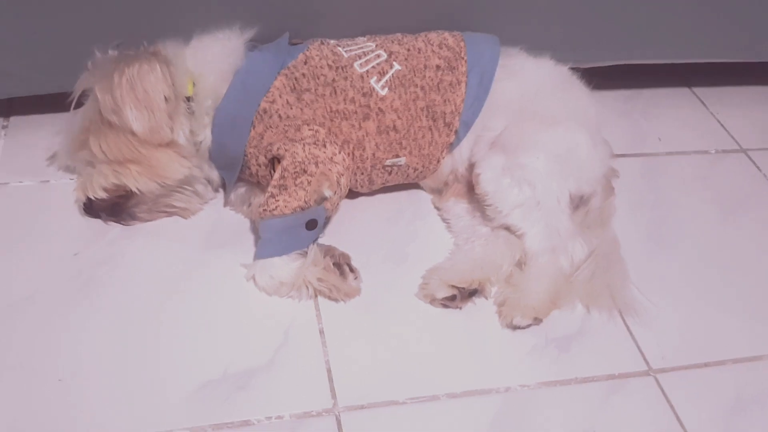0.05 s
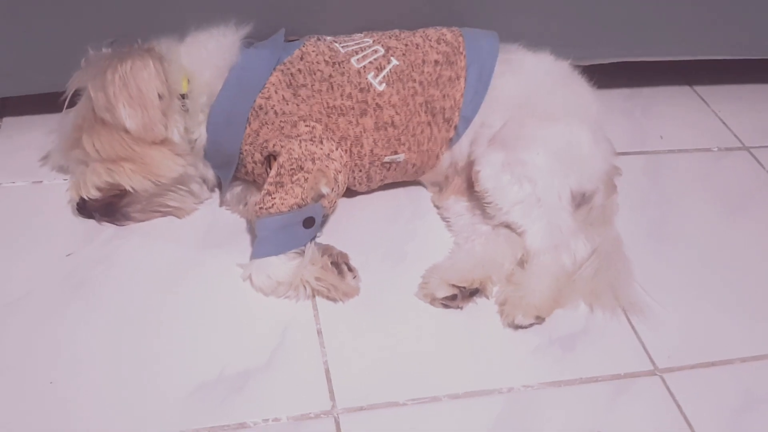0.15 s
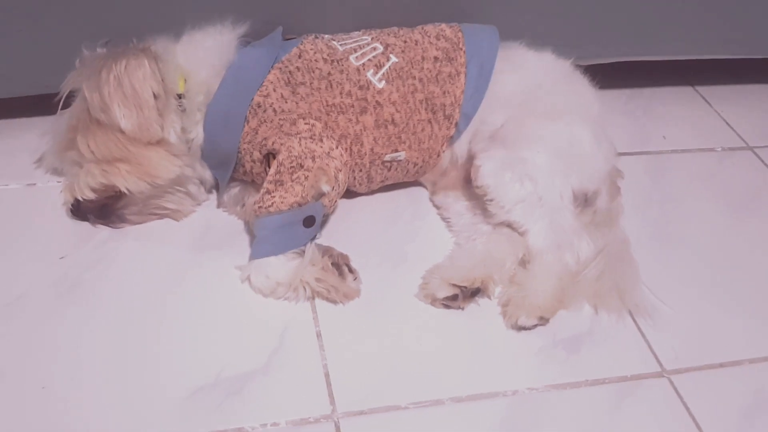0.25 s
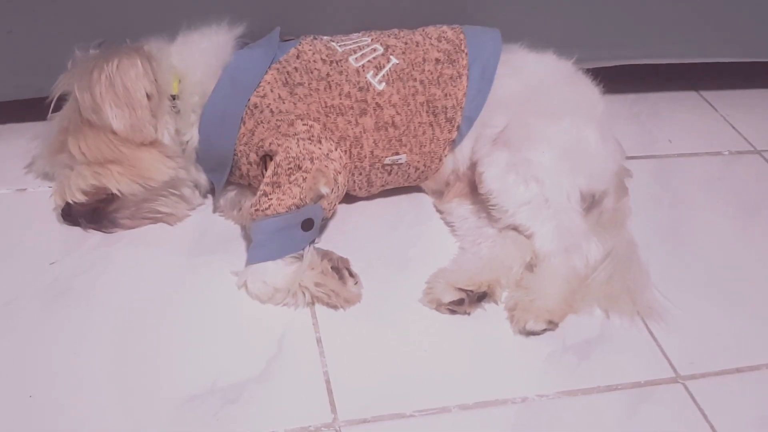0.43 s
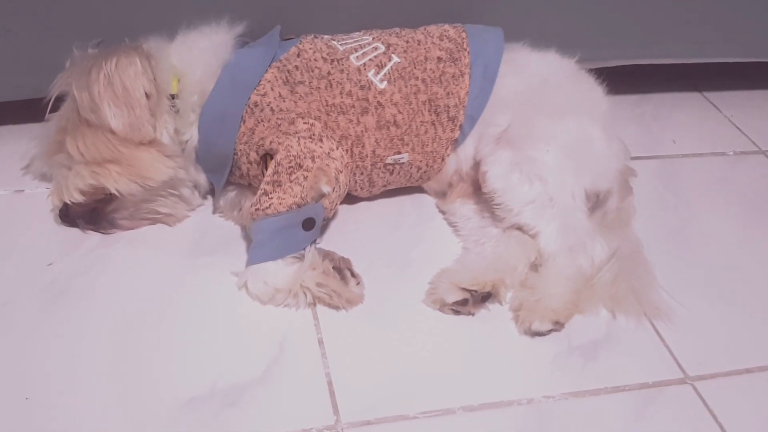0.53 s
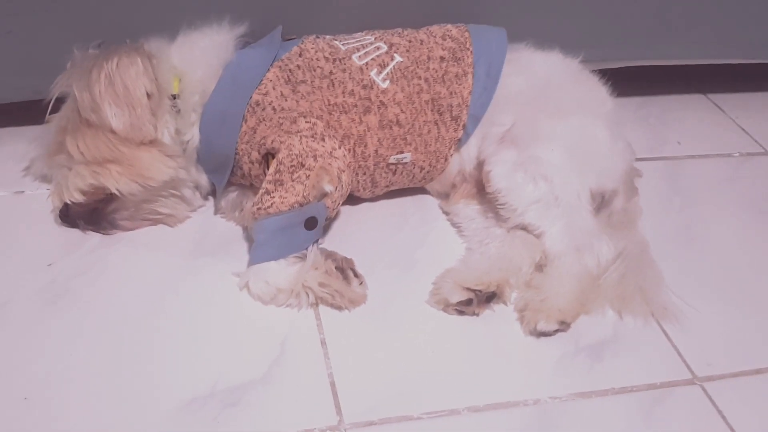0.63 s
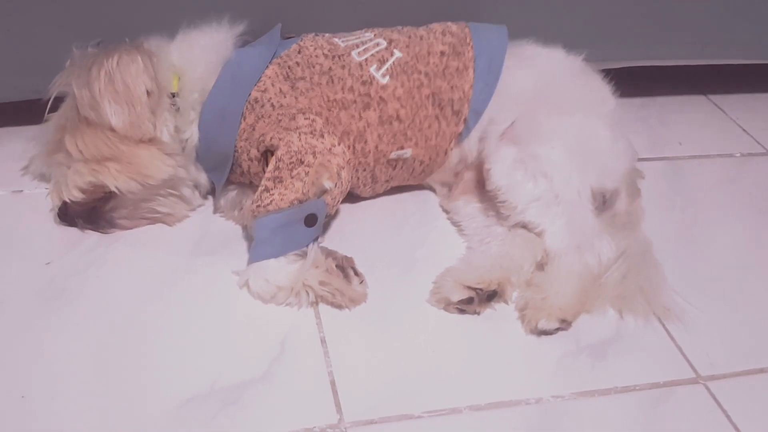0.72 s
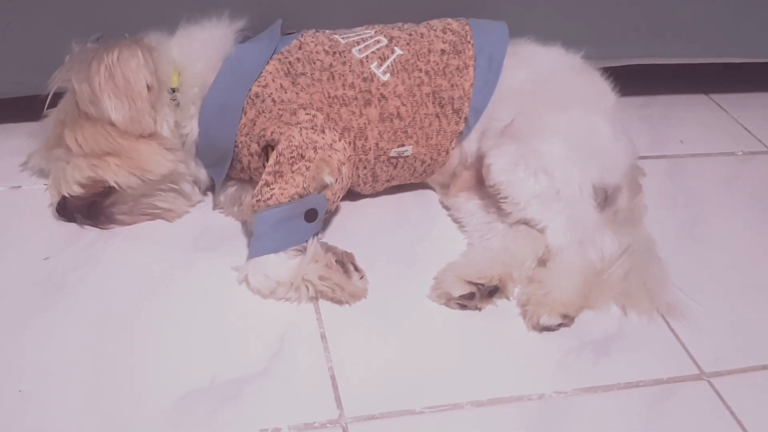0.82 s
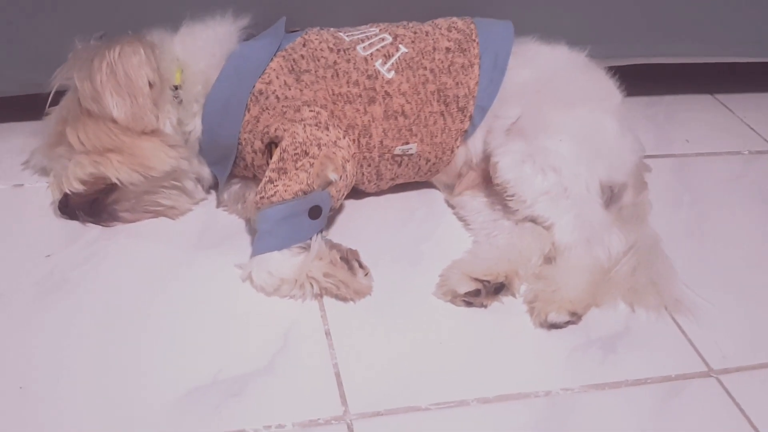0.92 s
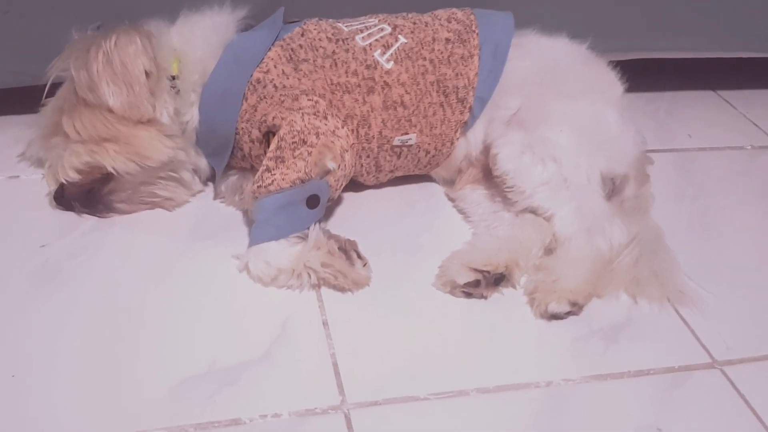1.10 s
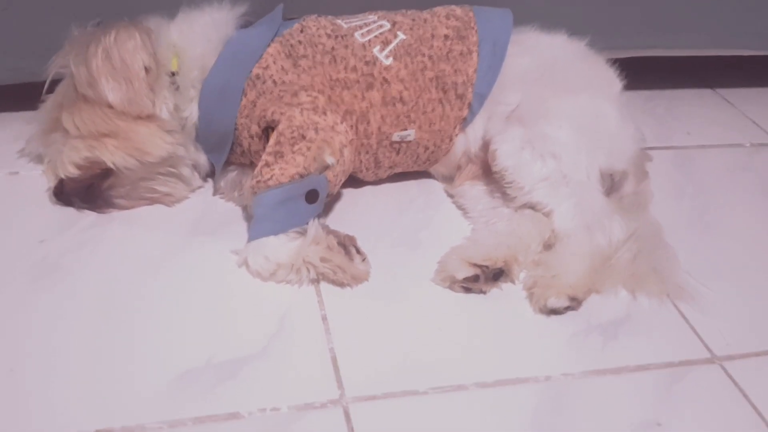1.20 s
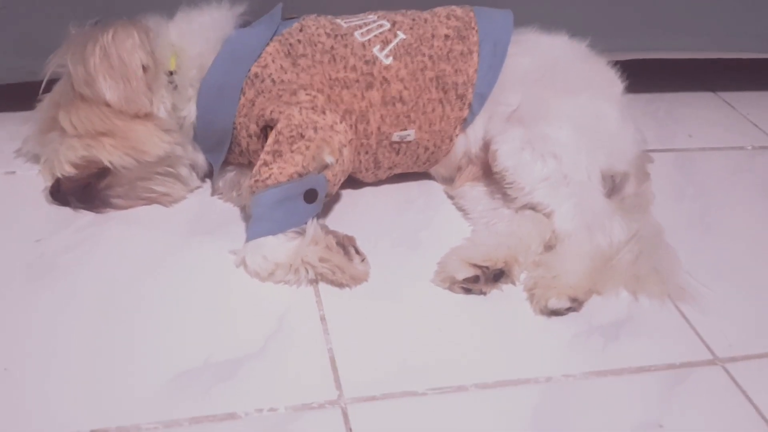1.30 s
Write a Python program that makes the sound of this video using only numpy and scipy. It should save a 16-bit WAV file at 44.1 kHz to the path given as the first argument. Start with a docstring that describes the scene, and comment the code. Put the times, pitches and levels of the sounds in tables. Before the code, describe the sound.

A sleeping dog gives one muffled woof, with small squeaks and puffs, close by indoors.

```python
"""Over a faint low hum, a small dog sniffs and grunts softly as it dreams on a tiled floor close by.
A squeak leads into one muffled woof: the voice hums behind shut lips, then puffs out the cheeks.
A second squeak ends in only a puff. Air hisses through the nose and lips, the wet lips smack,
and the hard room rings after each sound."""
import sys
import numpy as np
from scipy import signal
from scipy.fft import rfft, irfft
from scipy.io import wavfile

SR = 44100
rng = np.random.default_rng(int(sys.argv[2]) if len(sys.argv) > 2 else 0)


def master_out(mix):
    """Clip the mix to full scale and print it as 16-bit PCM to the path in sys.argv[1]."""
    frames = np.transpose(np.atleast_2d(mix))
    ceiling = np.clip(frames, -1, 1)
    pcm = np.round(ceiling * 32767).astype(np.int16)
    wavfile.write(sys.argv[1], SR, pcm)


N = 59535
T = np.arange(N) / SR
HZ = np.fft.rfftfreq(2 * N, 1 / SR)

# The tone of the room's steady noise: f/Hz, level/dB
ROOM_NOISE_TONE = [(20, -8), (40, -13.5), (65, 3.5), (92, -8), (125, 5.5), (170, -12.5), (290, -11),
                   (520, -28.5), (1500, -29.5), (3000, -28), (7000, -28), (9000, -40), (15500, -32)]
# The two notes of the low hum: f/Hz, level/dB
HUM_NOTES = [(70, -70), (118.6, -61)]
# Breaths through the nose: start t/s, length t/s, level/dB
SNIFFS = [(-.015, 0.093, -49), (.055, .11, -55.5)]
# The tone of air in the nose: f/Hz, level/dB
SNIFF_TONE = [(100, -17), (300, 11), (720, -4), (1000, -8), (2500, -11), (3050, -5), (3800, -14.5),
              (4850, -1.5), (5800, -15), (8300, -35.5), (10500, -26), (15000, -47)]
# How the grunt moves: t/s, pitch f/Hz, level/dB
GRUNT_PATH = [(.004, 211.5, -51.5), (.025, 241.6, -43), (.037, 237.6, -31), (.056, 239.7, -38),
              (.078, 218.5, -43.5), (.11, 213, -55)]
# How the grunt's overtones are turned down: f/Hz, level/dB
GRUNT_TONE = [(230, -2), (470, -16), (700, -17), (1000, -42.5), (2000, -69)]
# How the two squeaks move, one list each: t/s, pitch f/Hz, level/dB
SQUEAK_PATHS = [
    [(.174, 430, -33), (.188, 577, -33.5), (.197, 615, -24.5), (.212, 626, -37.5), (.224, 570, -27.5)],
    [(.727, 620, -38), (.735, 649, -40.5), (.748, 673, -40), (.761, 623, -38.5), (.768, 630, -47)],
]
# How the squeaks' overtones are turned down: f/Hz, level/dB
SQUEAK_TONE = [(450, -3), (630, -3.5), (1220, -15.5), (1400, -22.5), (1750, -31), (2020, -14), (2600, -26),
               (4300, -32), (6000, -41), (7800, -45), (10000, -58)]
# A rising whistle in each squeak: start t/s, length t/s, from f/Hz, to f/Hz, level/dB
WHISTLES = [(0.208, 0.011, 900, 950, -36), (0.742, 0.0248, 712.6, 1195, -42.5)]
# Breaths through the lips: start t/s, length t/s, level/dB
PUFFS = [(.217, 0.068, -37), (.268, 0.069, -42), (.771, 0.052, -42), (1.29, .1, -70)]
# The tone of air between the lips: f/Hz, level/dB
PUFF_TONE = [(300, -3), (620, -2), (1300, -4.5), (1900, 3), (2500, 3), (3100, -0.5), (3900, -8.5),
             (6200, -25), (7600, -20), (10000, -37), (15000, -29.5)]
# How the woof moves: t/s, pitch f/Hz, shut-lip level/dB, open-cheek level/dB, rasp level/dB
WOOF_PATH = [(.231, 150.5, -39, -69.5, -34), (.254, 149.9, -21.5, -53, -47.5), (.292, 158.6, -25, -54, -34),
             (.314, 153.3, -25, -52.5, -31.5), (.334, 140.8, -25, -31, -33.5),
             (.358, 139, -16, -24.5, -33.5), (.372, 140.3, -23.5, -33, -32), (.383, 142.3, -34, -29.5, -30),
             (.404, 139.1, -23, -24.5, -29), (.442, 136.5, -29, -37, -31.5),
             (.462, 131.6, -53.5, -45.5, -35), (.59, 133, -79.5, -100, -58.5)]
# How throat and cheeks colour the woof: f/Hz, shut-lip level/dB, open-cheek level/dB
THROAT_TONE = [(147, -10, -20), (309, 3, -17.5), (438, -22, -7.5), (560, -36.5, 1.5), (705, -37, -10.5),
               (806, -12, -4), (860, -32.5, -11), (1166, -43, -27.5), (1500, -35, -41)]
# The tone of the woof's rasp: f/Hz, level/dB
RASP_TONE = [(60, -56.5), (105, -24), (145, 0), (225, 8), (480, 2), (780, 5), (1150, -7.5), (1600, -11),
             (2200, -17.5), (4000, -30.5), (7000, -42), (15000, -67.5)]
# Lip smacks: t/s, level/dB, ring f/Hz, fade t/s
SMACKS = [(0.2708, -29, 5330, 0.00014), (.293, -21.5, 4800, 0.00011), (0.3074, -16, 4000, 0.00015),
          (.442, -39, 4760, 0.00012), (.548, -43.5, 4400, 0.000089), (0.8224, -17.5, 3014, 0.00014),
          (1.214, -41, 4800, 0.000067)]
# The room's ring: f/Hz, t/s to fade by 60 dB, level/dB, left-right likeness (0 to 1)
ROOM_RING = [(130, 0.66, -2.5, 0.84), (310, 0.19, -9, 0.89), (594, 0.39, -3.5, .4), (1203, 0.27, -4.5, 0),
             (3960, 0.25, -1, 0), (7650, 0.25, 7, 0.021), (14900, 0.14, 4.5, 0.049)]

TREMBLE_HZ, SQUEAK_JITTER = 90, .012  # jitter is random pitch wobble, as a share of the pitch


def amp(db):
    """Turns decibels into a number to multiply by."""
    return 10 ** (np.asarray(db) / 20)


def unit(x):
    """Scales a signal to an average strength (rms) of 1."""
    return x / np.sqrt(np.mean(x ** 2) + 1e-20)


def look_up(table, hz, column=1):
    """Reads a table between its rows, on a log scale of frequency."""
    columns = np.transpose(table)
    return np.interp(np.log(hz + 1), np.log(columns[0] + 1), columns[column])


def follow(path, fade_s=.004):
    """Gives a gate that fades a sound in and out, then the path's columns as curves in time."""
    times, *columns = np.transpose(path)
    gate = np.clip(np.minimum(T - times[0], times[-1] - T) / fade_s, 0, 1)
    return [gate] + [np.interp(T, times, column) for column in columns]


def shape(x, gain):
    """Filters a signal with one gain for each frequency."""
    return irfft(rfft(x, 2 * N) * gain)[..., :N]


def wander(hz):
    """A random wobble of strength 1, up to about the given speed."""
    return unit(shape(rng.standard_normal(N), 1 / (1 + (HZ / hz) ** 4)))


def stereo_noise():
    """Left and right noise as heard in the room: alike in the bass, apart in the treble."""
    likeness = np.clip(look_up(ROOM_RING, HZ, column=3), 0, 1)
    mid = shape(rng.standard_normal(N), np.sqrt((1 + likeness) / 2))
    side = shape(rng.standard_normal(N), np.sqrt((1 - likeness) / 2))
    return np.array([mid + side, mid - side])


def background(noise_db=-59, waver_db=7.5):
    """Faint room noise and a wavering low hum, there from the start."""
    noise = unit(shape(stereo_noise(), amp(look_up(ROOM_NOISE_TONE, HZ))))
    hum = np.zeros(N)
    for hz, db in HUM_NOTES:
        level = amp(db + waver_db * wander(0.8))
        hum += level * np.sqrt(2) * np.sin(2 * np.pi * (hz * T + rng.random()))
    return amp(noise_db) * noise + hum


def breath(bursts, tone, rise_s=0.01, fall_s=0.026, flutter_db=-2):
    """Air swirls through a narrow gap in the nose or lips and makes a fluttering hiss."""
    level = sum(amp(db) * np.clip(np.minimum((T - start) / rise_s, (start + length - T) / fall_s), 0, 1)
                for start, length, db in bursts)
    swirl = rng.standard_normal(N) * amp(flutter_db * wander(300))
    return level * unit(shape(swirl, amp(look_up(tone, HZ))))


def vocal_folds(hz, tone_db, harmonics):
    """The folds buzz at whole multiples of the pitch. Gives the buzz and a running count of cycles."""
    cycles = np.cumsum(hz) / SR
    buzz = sum(amp(tone_db(k * hz)) * np.sin(2 * np.pi * k * cycles) for k in range(1, harmonics + 1))
    return np.sqrt(2) * buzz, cycles


def whimper(path, tone, jitter, shimmer_db):
    """A short note of the voice that trembles in pitch (jitter) and in level (shimmer)."""
    gate, hz, db = follow(path)
    pitch = hz * (1 + jitter * wander(TREMBLE_HZ))
    voice, _ = vocal_folds(pitch, lambda f: look_up(tone, f), harmonics=14)
    return gate * amp(db + shimmer_db * wander(TREMBLE_HZ)) * voice


def grunt():
    """A soft, low, dull note from the vocal folds."""
    return whimper(GRUNT_PATH, GRUNT_TONE, jitter=.022, shimmer_db=3.5)


def squeak(path, leak_db=-25.5):
    """A thin, raspy whimper with air leaking round it."""
    gate, _, db = follow(path)
    leak = unit(shape(rng.standard_normal(N), amp(look_up(PUFF_TONE, HZ))))
    voice = whimper(path, SQUEAK_TONE, SQUEAK_JITTER, shimmer_db=3.8)
    return voice + gate * amp(db + leak_db) * leak


def whistles():
    """A thin, unsteady tone slides up as each squeak breaks."""
    out = np.zeros(N)
    for start, length, from_hz, to_hz, db in WHISTLES:
        progress = np.clip((T - start) / length, 0, 1)
        hz = (from_hz + (to_hz - from_hz) * progress) * (1 + SQUEAK_JITTER * wander(TREMBLE_HZ))
        swell = amp(db) * np.sin(np.pi * progress)
        out += swell * np.sqrt(2) * np.sin(2 * np.pi * np.cumsum(hz) / SR)
    return out


def woof(jitter=0.00907, wobble_hz=55, shimmer_db=0.5, lowest_hum_hz=146.6):
    """A raspy hum behind shut lips; a lower, brighter voice joins it as the cheeks blow open."""
    gate, hz, shut_db, open_db, rasp_db = follow(WOOF_PATH)
    waver = 1 + jitter * wander(wobble_hz)
    hum_hz = np.maximum(hz, lowest_hum_hz) * waver
    hum, cycles = vocal_folds(hum_hz, lambda f: shut_db + look_up(THROAT_TONE, f), harmonics=10)
    open_voice, _ = vocal_folds(
        hz * waver,
        lambda f: open_db + look_up(THROAT_TONE, f, column=2) + shimmer_db * wander(wobble_hz),
        harmonics=11)
    # The voice cracks as the cheeks give way: strong and weak cycles take turns.
    crack_s, crack_width_s, crack_depth = 0.313, 0.018, 0.45
    crack = 1 + crack_depth * np.exp(-((T - crack_s) / crack_width_s) ** 2) * np.cos(np.pi * cycles)
    airflow = .7 + np.exp(-(cycles % 1) / .7)  # a steady flow plus one fading puff each cycle
    rasp = unit(shape(airflow * stereo_noise(), amp(look_up(RASP_TONE, HZ))))
    return gate * (crack * (hum + open_voice) + amp(rasp_db) * rasp)


def lip_fizz(start_s=.236, length_s=.042, db=-36.5, hz=3200, width_hz=620):
    """Air forced between the lips sings briefly in one fuzzy band."""
    band = [(hz - 2 * width_hz, -40), (hz - width_hz / 2, 0),
            (hz + width_hz / 2, 0), (hz + 2 * width_hz, -40)]
    return breath([(start_s, length_s, db)], band)


def lip_smacks(spray_db=-13.5, spray_fade_s=0.0009, spray_top_hz=7900):
    """Wet lips part: a snap that swells and dies within a few cycles, and a short bright spray."""
    out = np.zeros(N)
    hiss = shape(rng.standard_normal(N), 1 / np.hypot(1, HZ / spray_top_hz))
    for start, db, hz, fade_s in SMACKS:
        age = np.maximum(T - start, 0)
        snap = age / fade_s * np.exp(1 - age / fade_s) * np.sin(2 * np.pi * hz * age)
        spray = amp(spray_db) * np.exp(-age / spray_fade_s) * hiss
        out += amp(db) * (T > start) * (snap + spray)
    return out


def first_echoes(x, db=1.5, gap_s=.0006, fade_s=0.004, low_cut_hz=900):
    """Quick, bright bounces off the floor and wall, with their own pattern on each side."""
    echoes = rng.standard_normal((2, N)) * np.exp(-T / fade_s) * (T > gap_s)
    echoes /= np.linalg.norm(echoes, axis=1, keepdims=True)
    echoes = shape(echoes, HZ ** 2 / (HZ ** 2 + low_cut_hz ** 2))
    return amp(db) * signal.fftconvolve(x[None], echoes, axes=1)[:, :N]


def room_ring(x, gap_s=0.0025):
    """Many echoes from tiles and walls blur together, each frequency band dying at its own speed."""
    hz, t, bands = signal.stft(stereo_noise(), SR, nperseg=256)
    ring_s = look_up(ROOM_RING, hz)[:, None]
    level = amp(look_up(ROOM_RING, hz, column=2))[:, None]
    fade_rate = np.log(1000) / ring_s
    fade = np.exp(-fade_rate * t) * np.sqrt(2 * fade_rate / SR)  # same energy for any ring time
    tail = signal.istft(bands * level * fade, SR, nperseg=256)[1][:, :N] * (T > gap_s)
    return signal.fftconvolve(x[None], tail, axes=1)[:, :N]


def scene(right_delay_s=0.0002, smack_echo_gain=0.55):
    """The woof spreads from the whole head; the small sounds of the muzzle reach the left side first."""
    voice = grunt() + whistles() + sum(squeak(path) for path in SQUEAK_PATHS)
    soft_sounds = voice + breath(SNIFFS, SNIFF_TONE) + breath(PUFFS, PUFF_TONE) + lip_fizz()
    bark, smacks = woof(), lip_smacks()
    muzzle_left = soft_sounds + smacks
    muzzle_right = shape(muzzle_left, np.exp(-2j * np.pi * HZ * right_delay_s))
    direct = bark + np.array([muzzle_left, muzzle_right])
    into_room = bark.mean(0) + soft_sounds + smack_echo_gain * smacks
    return direct + first_echoes(into_room) + room_ring(into_room) + background()


def record(dry):
    """Cuts away the highest treble."""
    low_pass = signal.firwin(511, cutoff=15900, window=("kaiser", 9), fs=SR)
    return signal.oaconvolve(dry, low_pass[None], "same")


dry = scene()
out = record(dry)
master_out(out)
```